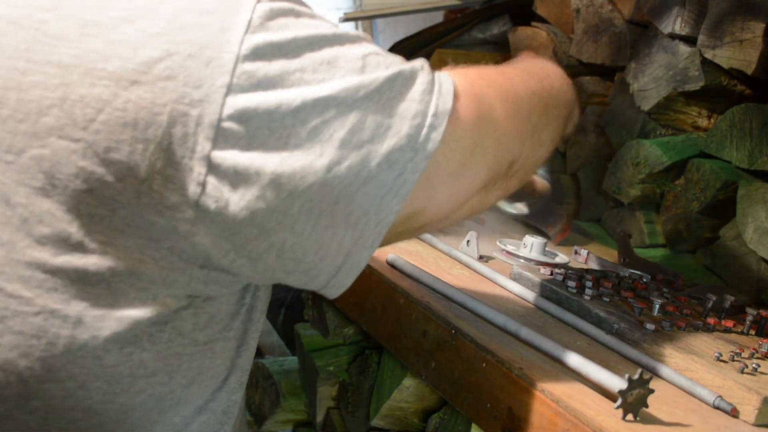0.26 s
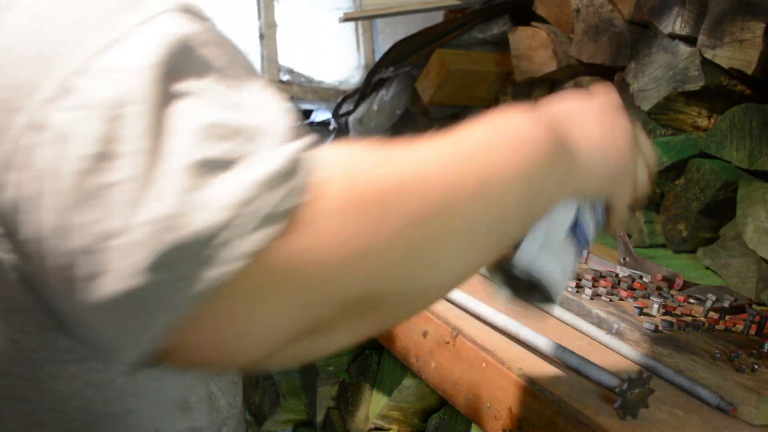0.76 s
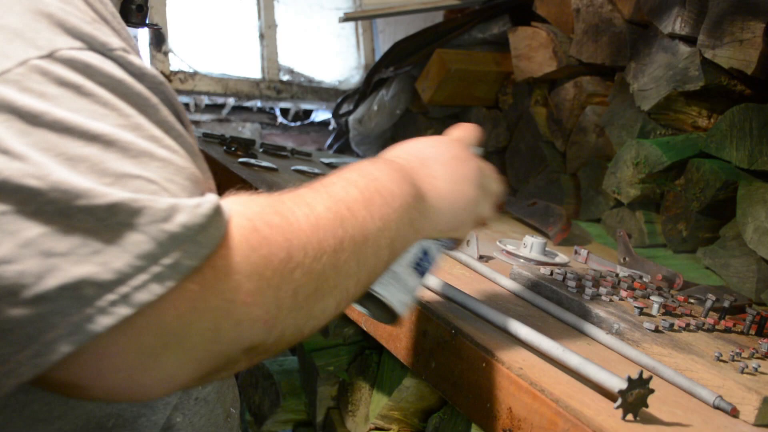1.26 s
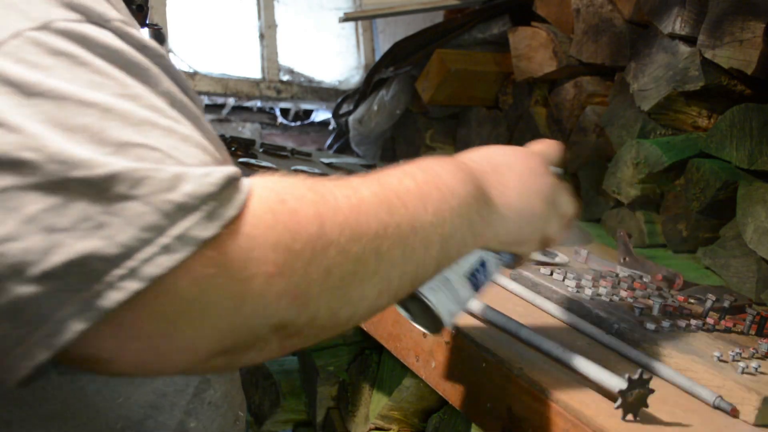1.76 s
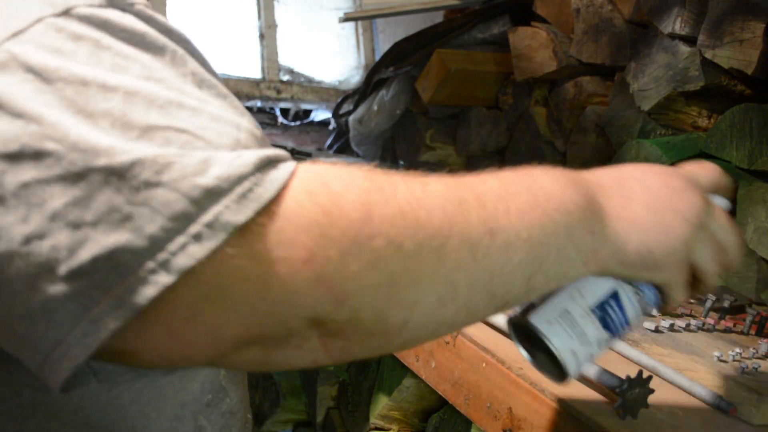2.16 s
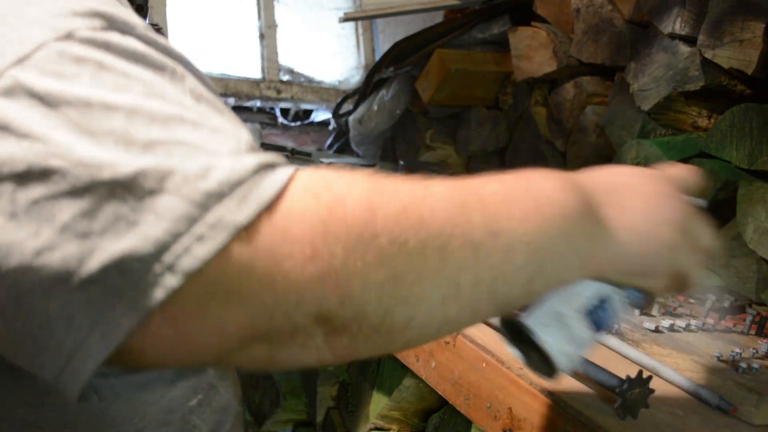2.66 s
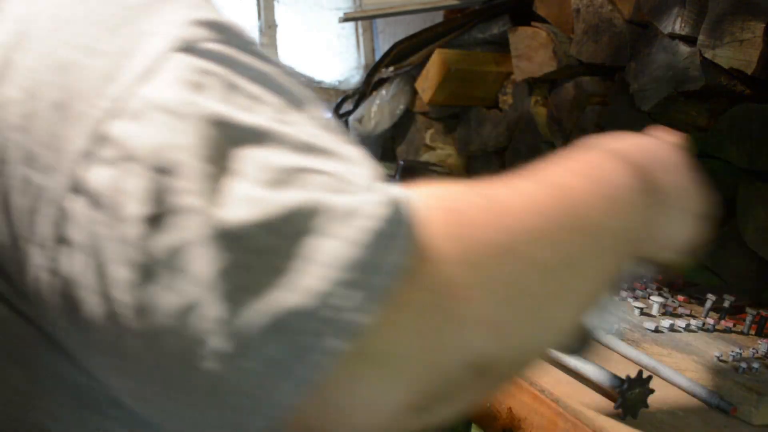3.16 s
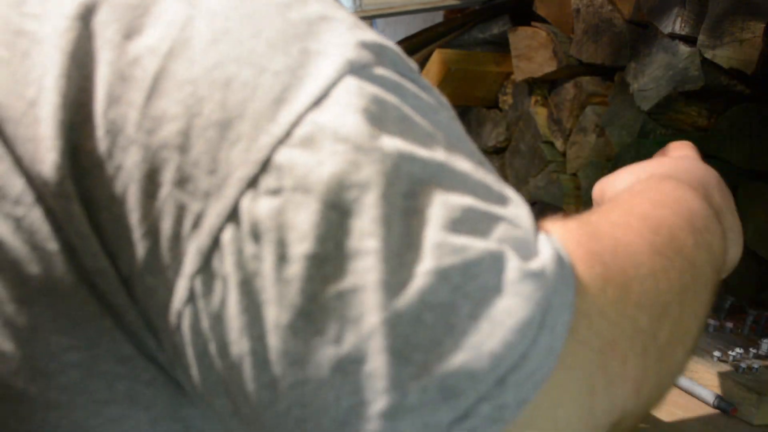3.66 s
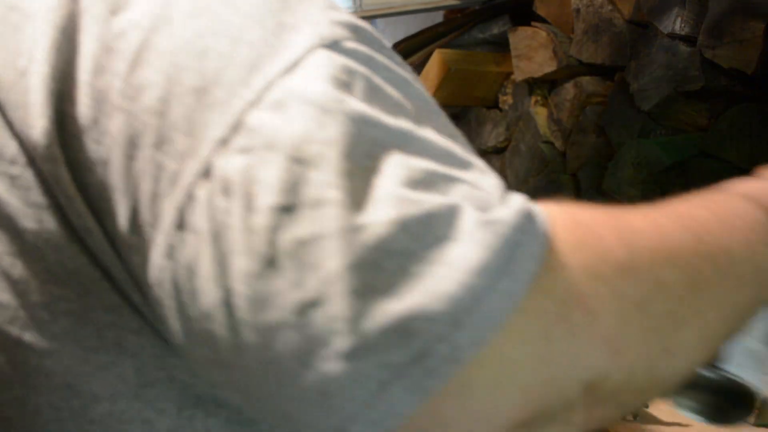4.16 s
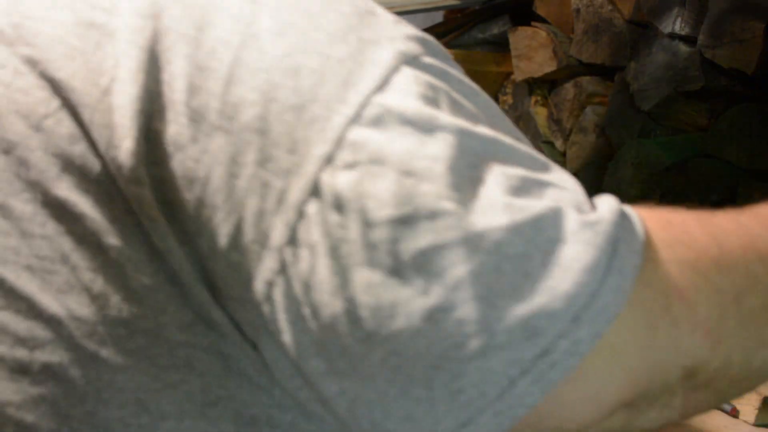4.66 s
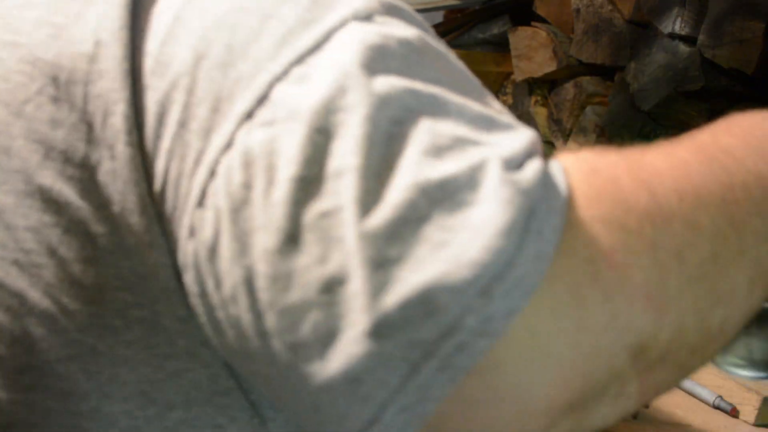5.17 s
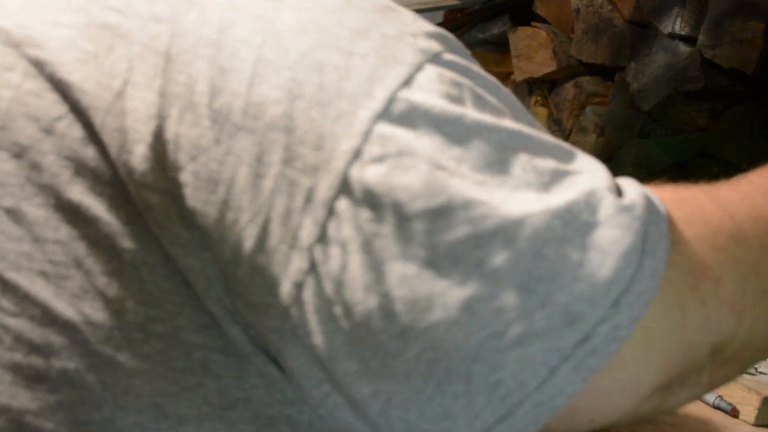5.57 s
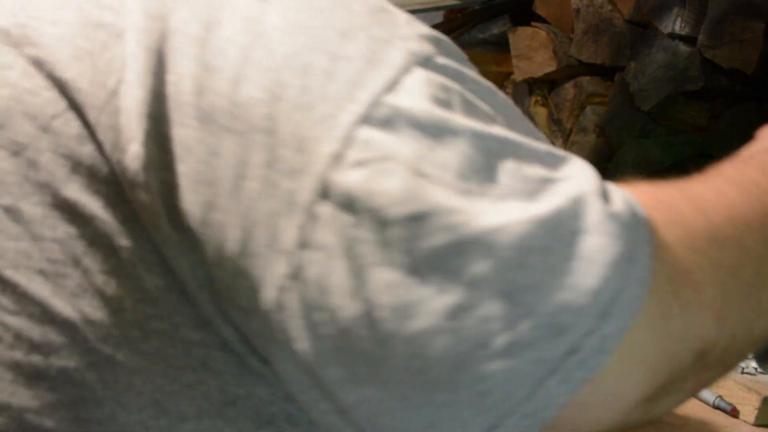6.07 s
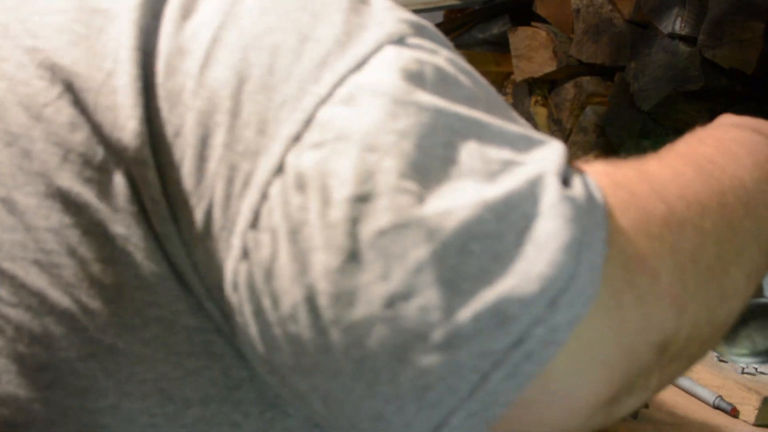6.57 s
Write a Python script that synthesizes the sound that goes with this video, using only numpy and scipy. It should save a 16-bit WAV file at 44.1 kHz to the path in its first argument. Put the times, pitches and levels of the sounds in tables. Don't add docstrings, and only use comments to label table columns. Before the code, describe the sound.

Spray paint comes out in rhythmic bright puffs, each about a fifth of a second, after one early puff and a longer pause. Small damped ticks from the can and soft cloth movement fill the gaps; a cluster of woody knocks comes near the middle. The sound is about a metre away, fairly dry with short reflections, over a soft low room rush and slight microphone hiss.

```python
import sys
import numpy as np
from scipy import signal
from scipy.fft import rfft, irfft
from scipy.io import wavfile
from scipy.ndimage import uniform_filter1d

SR = 44100
rng = np.random.default_rng(int(sys.argv[2]) if len(sys.argv) > 2 else 0)


def linear_from_db(decibels):
    return 10 ** (np.asarray(decibels, float) / 20)


def pcm_store(signal):
    levels = np.round(np.clip(np.atleast_2d(signal), -1, 1) * 32767)
    wavfile.write(sys.argv[1], SR, levels.astype(np.int16).T)


N = 300762
T = np.arange(N) / SR
HZ = np.maximum(np.arange(N // 2 + 1) * SR / N, 1)

# f/Hz, level/dB
SHED_SPECTRUM = [(24, -49), (40, -25), (81, -2), (184, -3), (213, -8.5), (281, -3), (361, -2.5), (430, -5),
                 (475, -4), (657, -9.5), (844, -5.5), (1000, -9), (1080, -10), (1540, -12.5),
                 (15700, -21.5)]
# f/Hz, likeness/1
SHED_LIKENESS = [(60, 0.96), (130, 0.93), (290, 0.92), (640, 0.72), (1410, 0.2), (3100, 0), (6820, 0.06),
                 (15000, 0.1)]
# f/Hz, width/Hz, level/dB
HUM_DRONES = [(104, 16, -73.5), (295, 40, -69), (351.5, 6.4, -67.5), (489, 2.5, -73.5), (910, 91, -70.5)]
# t/s, level/dB
RUSTLE_LEVEL = [(0, -56), (.4, -60.5), (.9, -63.5), (1.27, -58), (1.93, -54), (2.25, -60.5), (2.53, -51),
                (2.8, -45), (2.86, -54.5), (3.5, -54), (3.84, -61), (4.12, -53.5), (4.45, -63),
                (4.85, -61.5), (5.23, -55), (5.9, -58.5), (6.28, -63), (6.63, -65)]
# f/Hz, level/dB
CLOTH_SPECTRUM = [(300, -7.5), (600, 0), (1300, -0.5), (2500, -2.5), (3500, -6.5), (5000, -12), (9000, -25)]
# t/s, peak level/dB, ring f/Hz, t60/s
BENCH_KNOCKS = [(.244, -44, 540, 0.065), (2.561, -34.5, 794, 0.036), (2.748, -23.5, 670, 0.033),
                (2.77, -31, 620, 0.036), (2.98, -25.5, 1223, 0.058), (2.983, -31, 720, 0.049),
                (2.996, -23, 1360, 0.028), (3.003, -29, 1090, 0.031), (3.011, -28, 1990, 0.036),
                (3.008, -39, 645, 0.032), (3.022, -19.5, 690, 0.017), (3.024, -38, 184, 0.043),
                (3.035, -29.5, 293, 0.043)]
# t/s,
# length/s, f/Hz, width/Hz, level/dB
WALL_NOTES = [(0.941, 0.029, 3020, 300, -68), (2.466, .034, 1393, 6, -51), (1.9, 0.04, 1380, 6, -55),
              (2.6, .06, 1300, 30, -61), (2.746, 0.059, 4000, 3300, -41), (3.113, .06, 1360, 60, -65),
              (4.084, .07, 1500, 50, -72), (5.51, 0.07, 1830, 12, -64), (5.885, 0.038, 3200, 270, -60),
              (1.574, 0.13, 2900, 240, -59), (5.17, 0.077, 1900, 15, -68), (5.16, 0.13, 1330, 13, -61),
              (2.6, .014, 2700, 2000, -56), (2.505, 0.02, 3300, 700, -55)]
# t/s, peak level/dB, ring f/Hz
BALL_HITS = [(0.4438, -36, 2230), (0.4605, -47, 3040), (1.285, -30.5, 3440), (1.569, -34.5, 3320),
             (1.9118, -33, 1860), (1.9394, -58, 1290), (2.5072, -43, 3300), (3.138, -34, 3440),
             (3.7831, -36, 2120), (4.3919, -35, 1840), (4.8394, -60.5, 1250), (5.867, -34, 3070),
             (5.9464, -44, 2400)]
# t/s, length/s, start f/Hz, level/dB
SEAL_LEAKS = [(0.092, .01, 13500, -54), (0.961, 0.028, 12760, -46), (1.317, 0.01, 13700, -40),
              (1.968, 0.0066, 13940, -40), (2.28, 0.012, 13800, -42), (2.57, .012, 14000, -50),
              (3.217, 0.016, 14100, -43), (3.862, 0.013, 13500, -55), (4.149, .02, 13500, -46),
              (4.482, 0.014, 13960, -42), (4.912, 0.013, 13800, -42), (5.268, .017, 14200, -43),
              (5.606, 0.01, 14000, -47), (5.972, 0.012, 14000, -50), (6.321, 0.0081, 14000, -48)]
# t/s, length/s, lowest f/Hz, level/dB
GAS_SEEPS = [
    (2.279, .007, 10000, -44),
    (2.569, .01, 9500, -46),
    (3.218, .009, 10000, -42),
    (3.869, 0.022, 7260, -40.5),
    (4.149, .013, 8000, -45),
    (4.911, 0.013, 8000, -46),
    (5.976, .024, 6750, -39),
]
# paint breaks out t/s, held/s, jet level/dB, change while held/dB, rise/s
PRESSES = [(0.098, .2, -31.5, -3.5, 0.011), (.984, 0.2, -29.5, -3, 0.0072),
           (1.327, 0.18, -27.5, 0.5, 0.011), (1.649, 0.16, -28, -3, 0.0069),
           (1.978, 0.17, -28.5, -2, 0.0079), (2.29, .14, -29.5, -3, 0.0087),
           (2.576, 0.16, -29, -4.5, 0.012), (2.898, 0.15, -27, -3, 0.013), (3.228, 0.16, -28.5, -1, 0.0085),
           (3.551, 0.17, -28.5, -2, .011), (3.886, 0.13, -29.5, -2.7, .01),
           (4.161, 0.16, -28.5, -1.5, 0.0073), (4.494, 0.24, -29, -2, 0.0091),
           (4.921, 0.19, -27.5, 0.5, 0.017), (5.285, 0.17, -28, -3, 0.0071),
           (5.612, 0.2, -29.5, 0.3, 0.0081), (5.995, 0.17, -28.5, -2.5, 0.0093),
           (6.33, 0.18, -30, -0.5, 0.0088), (6.687, 0.27, -29.5, -1, 0.0076)]
# whistle on pressing/dB, on letting go/dB, splash/dB, top/dB, body/dB (all re jet)
PRESS_GRIPS = [(1.5, -1, -13.5, 4.5, -0.5), (-4.5, -23, -12.5, 4.5, 0), (-4, -18, -14.5, 3, -0.5),
               (-5, -29, -13, 4, 1.5), (-3.5, -6.5, -13, 2, -0.5), (0.5, -16, -11.5, 2.5, -0.5),
               (-3.5, -9, -10.5, 3.5, -0.5), (-5.5, -5.5, -12.5, .6, 0), (1.5, -8.5, -13.5, 0, 1),
               (1, -24, -13, 1, 2.5), (-2, -5, -14, 1, -0.5), (1, -10, -10.5, 1.5, 0.5),
               (1.5, -4, -14.5, .6, -2), (3, -19, -14.5, -1, 1), (-1.5, -19, -14.5, 0, -1),
               (0, -8, -14.5, 0, 1), (-2, -27, -13.5, -1.5, -1), (-4, -4, -13.5, 1.5, 0),
               (-12, -20, -13.5, .4, 1)]
# f/Hz, level/dB
JET_SPECTRUM = [(1880, -21.5), (3200, -7), (3570, -10), (4180, -4), (4800, -3.5), (5790, -4), (6270, -6),
                (6950, -3), (12500, -2), (16200, -57), (22000, -120)]
# f/Hz, level/dB
SPLASH_SPECTRUM = [(200, -53), (550, -11.5), (800, -7.5), (1200, 1.5), (1600, -1), (2200, 3), (2600, -6.5),
                   (3600, 2), (4200, -16.5)]
# f/Hz, level/dB
TOP_SPECTRUM = [(6000, -70), (10500, -20), (11800, -9.5), (13500, -1), (15300, 1.5), (15900, -3)]
# f/Hz, width/Hz, level/dB
VALVE_MODES = [(2597, 390, -7.5), (2864, 300, -4)]
# f/Hz, width/Hz, level/dB re jet
NOZZLE_MODES = [(5080, 130, -22.5), (5990, 780, -12.5), (7000, 550, -15.5), (8730, 140, -16.5)]
# f/Hz, level/dB
ECHO_SIDE = [(60, -25), (110, -24), (200, -10), (380, -31.5), (700, -15), (1290, -49.5), (2380, -13.5),
             (4400, -10.5), (8120, -5), (15000, 0.5)]
# f/Hz, level/dB
LEFT_SHADE = [(300, -.6), (1200, -.3), (2500, -.5), (5000, -.4), (13000, -1.2)]


def on_log(table):
    hz, value = np.transpose(table)
    return np.interp(np.log(HZ), np.log(hz), value)


def unit(x):
    return x / np.sqrt(np.mean(x ** 2))


def hiss(gain):
    return unit(irfft(rfft(rng.standard_normal(N)) * gain, N))


def bell(hz, width):
    return 1 / (1 + (2 * (HZ - hz) / width) ** 2)


def walk(rate):
    hold = int(SR / rate)
    steps = np.repeat(rng.standard_normal(N // hold + 1), hold)[:N]
    return 0.91 * uniform_filter1d(uniform_filter1d(steps, hold), hold)


def add(out, s, x):
    i = int(s * SR)
    out[i:i + len(x)] += x[:N - i]


def shed():
    alike = np.sqrt(np.clip(on_log(SHED_LIKENESS) * 1.1 - 0.05, 0, 1))
    noise = rfft(rng.standard_normal((2, N))) * linear_from_db(on_log(SHED_SPECTRUM))
    mid, side = irfft(noise * np.sqrt([1 + alike, 1 - alike]), N)
    mid = mid * linear_from_db(0.6 * walk(4))
    scale = linear_from_db(-56) / np.sqrt(np.mean(mid ** 2))
    drones = sum(linear_from_db(db + 0.5 * walk(4.5)) * hiss(bell(hz, width)) for hz, width, db in HUM_DRONES)
    return np.array([scale * mid + drones, scale * side])


def rustle():
    effort_db = np.interp(T, *np.transpose(RUSTLE_LEVEL))
    return linear_from_db(effort_db + 1.8 * walk(30)) * hiss(linear_from_db(on_log(CLOTH_SPECTRUM)))


def knocks():
    out, t = np.zeros(N), T[:SR // 4]
    scuff = hiss(bell(680, 500))
    for s, db, hz, t60 in BENCH_KNOCKS:
        fade = np.exp(-np.log(1000) * t / t60)
        i = int(s * SR)
        ring = np.sin(2 * np.pi * hz * t) * fade
        ring = ring + 0.07 * scuff[i:i + len(t)] * fade ** 0.3
        add(out, s, linear_from_db(db) * ring * np.minimum(t / 0.002, 1))
    return irfft(rfft(out) / (1 + (110 / HZ) ** 4), N)


def streaks():
    out = np.zeros(N)
    for s, length, hz, width, db in WALL_NOTES:
        swell = np.sin(np.pi * T[:int(length * SR)] / length) ** 0.3
        add(out, s, linear_from_db(db + 2.0) * swell * unit(hiss(bell(hz, width))[:len(swell)]))
    return out


def rattle():
    out, t = np.zeros(N), T[:SR // 8]
    slosh = hiss(bell(3200, 3400) ** 0.95 / (1 + (HZ / 3970) ** 12))
    slosh_fade = 0.36 * np.exp(-t / 0.0026) + 0.23 * np.exp(-t / 0.021)
    tick = np.sin(2 * np.pi * 2200 * t) * np.exp(-t / 0.00023)
    tick = tick + 0.15 * rng.standard_normal(len(t)) * np.exp(-t / 0.0015)
    for s, db, hz in BALL_HITS:
        ring = np.sin(2 * np.pi * hz * t) * np.exp(-t / 0.0036)
        i = int(s * SR)
        wash = slosh[i:i + len(t)] * slosh_fade
        add(out, s, linear_from_db(db - 5.5) * (1.1 * tick + 0.57 * ring + wash))
    return out


def leaks():
    out = np.zeros(N)
    flutter = hiss(bell(0, 1230))
    end_hz = 14200
    for s, length, start_hz, db in SEAL_LEAKS:
        u = T[:int(length * SR)] / length
        phase = 2 * np.pi * np.cumsum(start_hz + (end_hz - start_hz) * u ** 2) / SR
        i = int(s * SR)
        add(out, s, linear_from_db(db) * np.minimum(6 * u, 1) * flutter[i:i + len(u)] * np.sin(phase))
    for s, length, low_hz, db in GAS_SEEPS:
        u = T[:int(length * SR)] / length
        gas = hiss(1 / (1 + (low_hz / HZ) ** 16))[:len(u)]
        add(out, s, linear_from_db(db) * np.minimum(8 * u, 1) * gas)
    return out


def patchy(colour, lo_hz, hi_hz, patchy_db, rate, step_hz=1300):
    strips = (np.exp(-((HZ - hz) / step_hz) ** 2) for hz in np.arange(lo_hz, hi_hz, step_hz))
    noise = rfft(rng.standard_normal(N)) * colour
    return unit(sum(irfft(noise * strip, N) * linear_from_db(patchy_db * walk(rate)) for strip in strips))


def valve():
    gains = np.zeros((5, N))
    t = T[:SR // 2]
    knee_s = 0.003
    for (s, held, db, change_db, rise), grip in zip(PRESSES, PRESS_GRIPS):
        press_db, let_go_db, splash_db, top_db, body_db = grip
        shut = knee_s * np.logaddexp(0, (t - held) / knee_s)
        flow_db = db + change_db * (np.minimum(t / held, 1) - 0.5) - 560 * shut
        jet = linear_from_db(flow_db - 22.5 * np.exp(-t / rise))
        pressing = linear_from_db(press_db) * np.exp(-t / 0.039)
        letting_go = linear_from_db(let_go_db) * np.exp(-((t - held + 0.017) / 0.021) ** 2)
        whistle = jet * (linear_from_db(-16.5) + pressing + letting_go)
        splash = jet * linear_from_db(splash_db + 8.5 * np.exp(-t / 0.02) + 207 * shut)
        top = linear_from_db(flow_db + top_db - 27.5 * np.exp(-t / rise / 1.1) - 162 * shut)
        body = jet * (linear_from_db(body_db) - 1)
        for gain, shape in zip(gains, (jet, whistle, splash, top, body)):
            add(gain, s, shape)
    return gains


def spray():
    jet = patchy(linear_from_db(on_log(JET_SPECTRUM)), 2500, 14500, patchy_db=4.5, rate=30)
    jet = jet + sum(linear_from_db(db + 4.5 * walk(25)) * hiss(bell(hz, width)) for hz, width, db in NOZZLE_MODES)
    jet = unit(jet)
    whistle = unit(sum(linear_from_db(db + 3.0 * walk(50)) * hiss(bell(hz, width)) for hz, width, db in VALVE_MODES))
    splash = hiss(linear_from_db(on_log(SPLASH_SPECTRUM))) * linear_from_db(2.05 * walk(60))
    top = patchy(linear_from_db(on_log(TOP_SPECTRUM)), 10500, 17000, patchy_db=1.0, rate=30)
    body = irfft(rfft(jet) * np.exp(-(2 * (HZ - 4400) / 1000) ** 2), N)
    layers = np.array([jet, linear_from_db(-4.5) * whistle, splash, linear_from_db(-3.2) * top, body])
    sputter = linear_from_db(1.0 * walk(250))
    return irfft(rfft(sputter * np.sum(valve() * layers, axis=0)) / (1 + (350 / HZ) ** 4), N)


def tail(t60):
    t = T[:SR // 2]
    x = rng.standard_normal(len(t)) * np.exp(-np.log(1000) * t / t60) * (t > 0.001)
    return x / np.sqrt(np.sum(x ** 2))


def moving_echo(x):
    share = np.array([walk(12) for _ in range(4)])
    share /= np.sqrt(np.sum(share ** 2, axis=0))
    out = np.zeros(N)
    for part in share:
        place = linear_from_db(-5.5) * tail(0.063) + linear_from_db(-15.5) * tail(0.2)
        out += signal.oaconvolve(x * part, place)[:N]
    return out


def scene():
    thuds = knocks() + streaks()
    can = spray() + leaks() + rattle() + rustle() + 0.2 * thuds
    mid = can + moving_echo(can) + 0.85 * thuds
    side = irfft(rfft(moving_echo(can)) * linear_from_db(on_log(ECHO_SIDE) + 2.5), N)
    mid, side = np.array([mid, side]) + shed()
    shade_db = on_log(LEFT_SHADE) / 2
    return irfft(rfft([mid + side, mid - side]) * linear_from_db([shade_db, -shade_db]), N)


def roll_off(x):
    return signal.sosfilt(signal.butter(12, 17090, fs=SR, output="sos"), x)


def record(dry):
    treble_cut = 0.5 - 0.5 * np.tanh((HZ - 15740) / 30)
    rumble_cut = 1 / np.sqrt(1 + (57.5 / HZ) ** 8)
    mix = irfft(rfft(dry) * treble_cut * rumble_cut, N)
    return roll_off(mix)


dry = scene()
out = record(dry)
pcm_store(out)
```